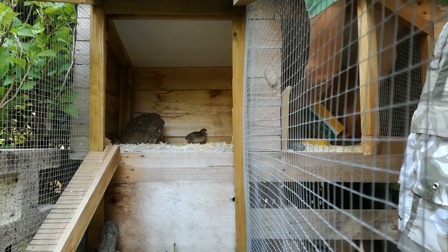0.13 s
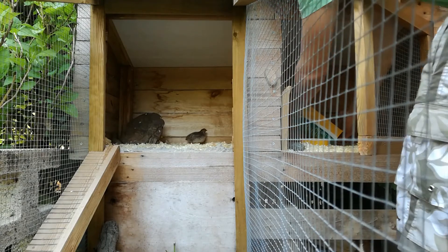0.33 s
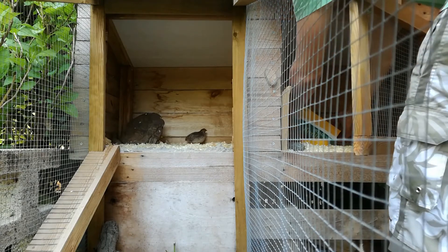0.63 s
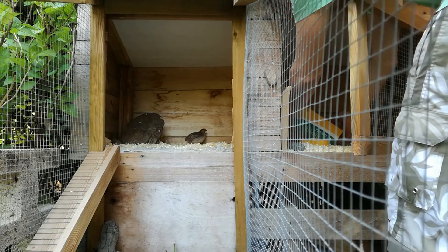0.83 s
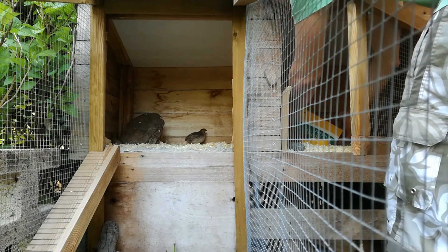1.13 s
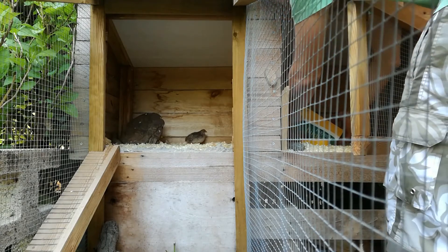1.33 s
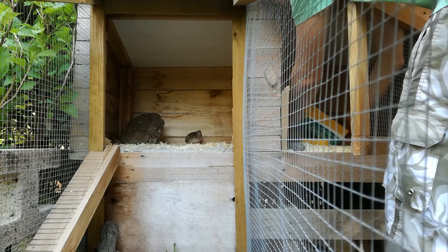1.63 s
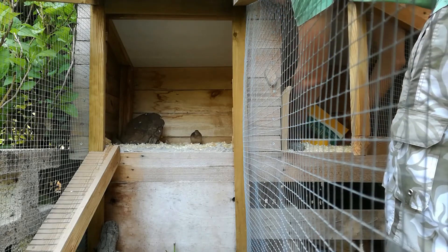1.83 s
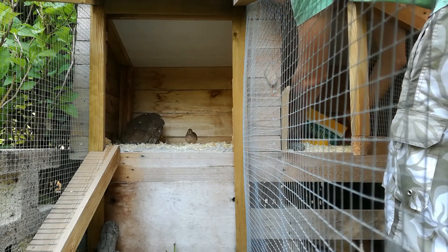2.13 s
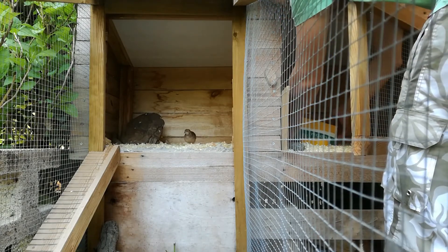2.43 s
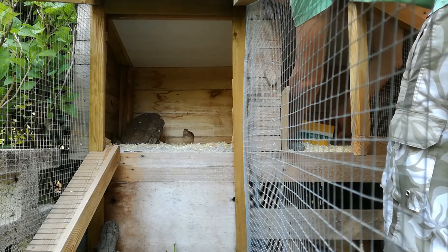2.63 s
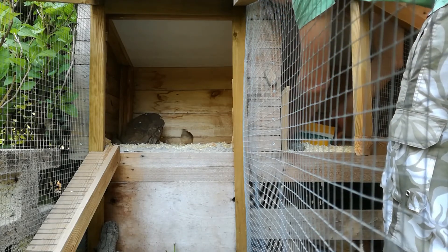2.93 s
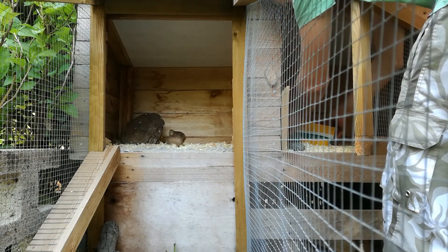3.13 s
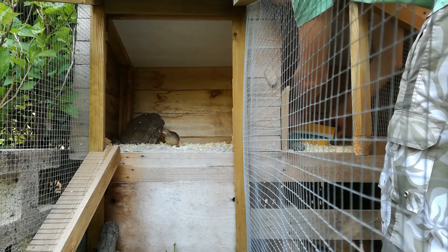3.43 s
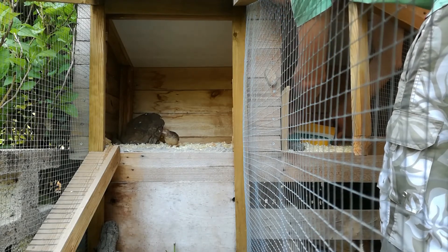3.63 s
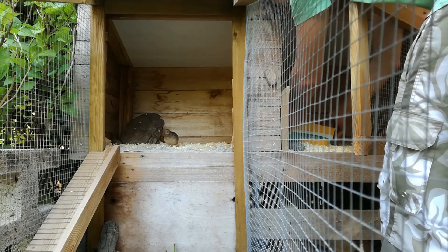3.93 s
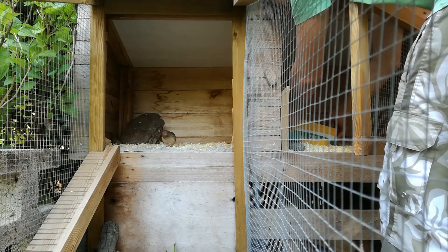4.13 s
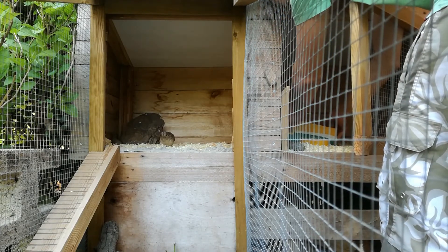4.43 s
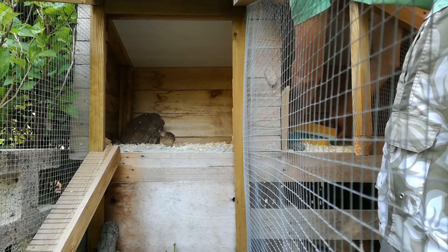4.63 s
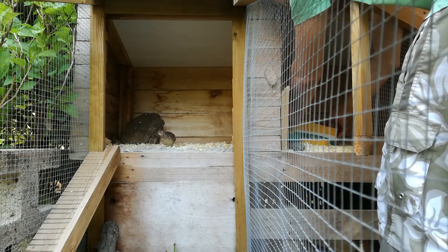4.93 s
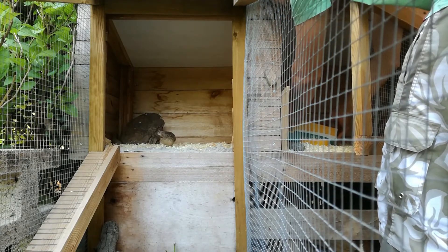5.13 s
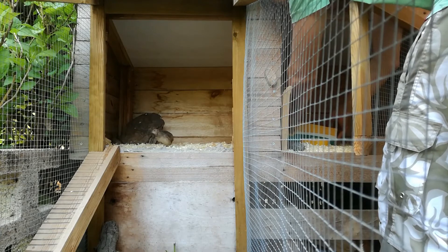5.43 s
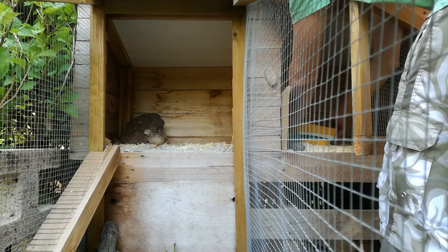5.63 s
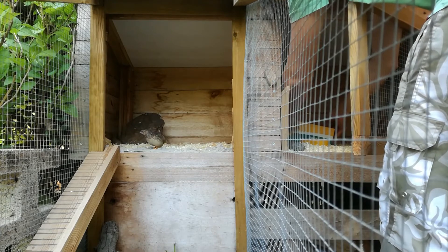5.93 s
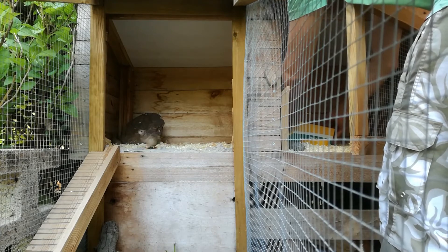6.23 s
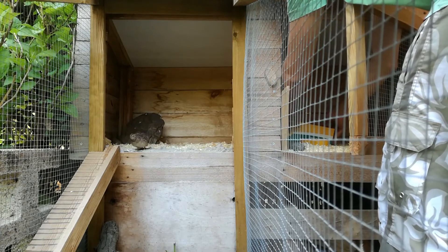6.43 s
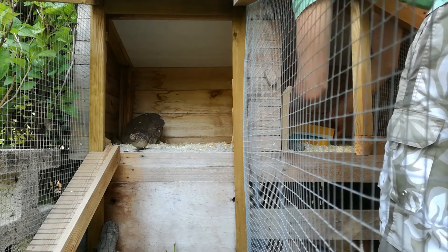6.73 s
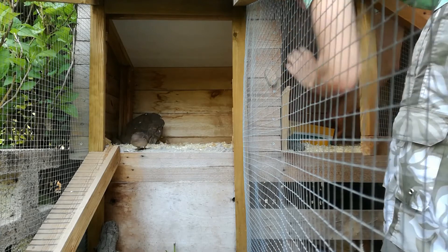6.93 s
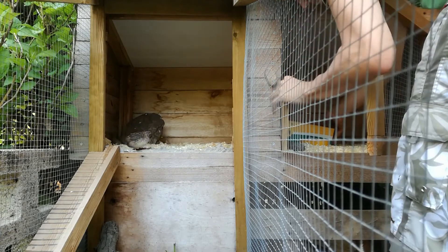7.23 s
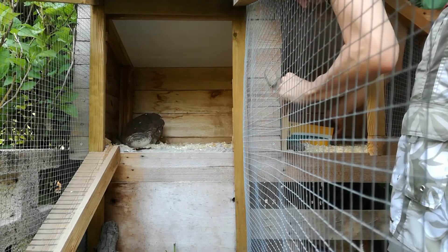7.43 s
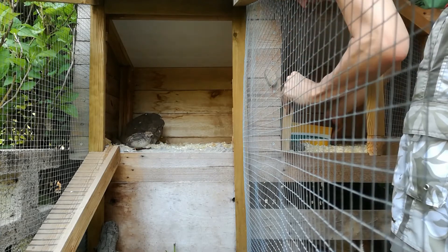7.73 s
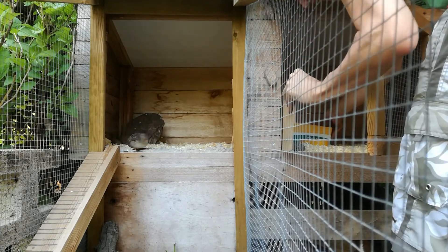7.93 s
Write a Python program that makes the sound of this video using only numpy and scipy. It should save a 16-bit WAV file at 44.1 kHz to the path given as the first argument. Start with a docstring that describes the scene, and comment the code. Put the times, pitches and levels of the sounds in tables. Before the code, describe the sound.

Outdoors, close to a small wooden hutch, quail give a brief crisp scratch in dry shavings, then fall nearly silent. A rapid flurry of sharp strokes and small woody knocks follows, then sparse soft shuffles. A second, softer spell of scraping comes later and dies into light rustles. Boxy short echoes, quiet garden hiss, wide stereo bass.

```python
"""On the floor of a small wooden hutch, outdoors, quail scratch and shuffle in wood shavings.
Strokes and shuffles are swelling swarms of random snaps in octave bands; soft rustles fill in between.
Knocks are short noise bursts coloured as boards; the frame rumbles and faint thin tones come and go.
Dense echoes and box resonances colour the moves and knocks, over a quiet garden hiss in shaped noise.
The microphone pair widens the bass."""
import sys
import numpy as np
from scipy import signal
from scipy.fft import rfft, irfft
from scipy.io import wavfile

SR = 44100
rng = np.random.default_rng(int(sys.argv[2]) if len(sys.argv) > 2 else 0)


def digitize_waveform(pressure):
    """Quantize a signal to 16-bit integers and store it at the path in sys.argv[1].

    Rows of a 2-D input are taken as channels; values are limited to [-1, 1].
    """
    field = np.atleast_2d(pressure).T
    bounded = np.clip(field, -1, 1)
    quanta = np.round(bounded * 32767).astype(np.int16)
    wavfile.write(sys.argv[1], SR, quanta)


N = 356151
FREQ = np.fft.rfftfreq(N, 1 / SR)
BIRDS_PAN_DB = -1.5  # left minus right

# relative spectrum of snapping flakes: frequency_hz, density_db
FLAKE_SPECTRUM = [(100, -35), (300, -24), (600, -23), (1000, -10.5), (2400, -9), (3400, -6), (4600, -1.5),
                  (5600, -3), (7000, -12.5), (9500, -19), (14500, -25)]


def undb(db):
    """Logarithmic level: decibels become an amplitude ratio."""
    return 10 ** (np.asarray(db) / 20)


def centred_time(size):
    """Time axis in seconds with its zero in the middle of the block."""
    return (np.arange(size) - size / 2) / SR


def spectrum(points, hz):
    """Spectral envelope: dB points joined by straight lines on a log-frequency axis."""
    at_hz, db = np.transpose(points)
    return undb(np.interp(np.log(hz + 1), np.log(at_hz), db))


def colour(x, points, low_db=0, high_db=0, low_hz=2000, high_hz=7500):
    """Linear filtering: white sound takes a spectrum at equal power, then low and high shelves."""
    hz = np.fft.rfftfreq(x.shape[-1], 1 / SR)
    gain = spectrum(points, hz)
    gain = gain / np.sqrt(np.mean(gain ** 2))
    low_shelf = low_db / (1 + (hz / low_hz) ** 4)
    high_shelf = high_db * (1 - 1 / (1 + (hz / high_hz) ** 4))
    return irfft(rfft(x) * gain * undb(low_shelf + high_shelf), x.shape[-1])


def swell(t, rise, fall, rise_shape=1.95, fall_shape=1.2):
    """Amplitude envelope: stretched exponentials rise to a peak at t = 0 and fall from it."""
    before = np.abs(t / rise) ** rise_shape
    after = np.abs(t / fall) ** fall_shape
    return np.exp(-np.where(t < 0, before, after))


def crackle(size, rate, spread_db):
    """Shot noise: random snaps, rate per second, of randomly spread sizes and unit total power."""
    snaps = rng.standard_normal(size) * (rng.random(size) < rate / SR)
    boost = np.minimum(rng.exponential(size=size), np.pi)
    snaps = snaps * undb(spread_db * boost)
    return snaps / np.sqrt(np.mean(snaps ** 2) + 1e-18)


def add(out, x, start, pan_db):
    """Superposition: a stereo sound joins the mix at its start, panned by level difference."""
    i = int(round(start * SR))
    a, b = max(i, 0), min(i + x.shape[1], N)
    out[:, a:b] += undb([[pan_db / 2], [-pan_db / 2]]) * x[:, a - i:b - i]


def convolve(x, response):
    """Convolution with an impulse response, kept at the sound's own length."""
    return signal.fftconvolve(np.atleast_2d(x), response, axes=1)[:, :x.shape[-1]]


def reflect(x, t60=0.062, direct_db=1.5, late_db=-22, late_t60=0.35, lag_s=.00045, size=6000):
    """Reverberation of close walls: direct sound and a fresh pattern of dense echoes at each port."""
    t = np.arange(size) / SR
    decay = undb(-60 * t / t60) + undb(late_db - 60 * t / late_t60)
    response = rng.standard_normal((2, size)) * decay
    response /= np.sqrt(np.sum(response ** 2, axis=1, keepdims=True))
    # the direct sound reaches the left port later, by 0.5 to 1.5 times lag_s
    left_lag = int(lag_s * SR * (.5 + rng.random()))
    response[0, left_lag] += undb(direct_db)
    response[1, 0] += undb(direct_db)
    return convolve(x, response / np.sqrt(1 + undb(direct_db) ** 2))


def garden(level_db=-61.5, pan_db=-1.0):
    """Broadband noise: a smooth distant outdoor hiss with a little low rumble."""
    # relative spectrum: frequency_hz, density_db
    hiss_spectrum = [(20, -25), (50, 3.5), (90, 4.5), (160, -3.5), (400, -13), (1000, -12), (2200, -12),
                     (4800, -9), (7500, -14.5), (11000, -26), (15000, -25)]
    levels_db = level_db + np.array([[pan_db], [-pan_db]]) / 2
    return undb(levels_db) * colour(rng.standard_normal((2, N)), hiss_spectrum)


def tones(size=32768):
    """Narrowband noise: random phases close to a gliding pitch make faint tones that swell and fade."""
    # faint thin tones and distant twitter: peak_s, pitch_hz, level_db, half_length_s, width_hz, glide_hz_per_s
    tone_events = [(.575, 1324, -66.5, 0.072, 20, 0), (.584, 5500, -67, 0.084, 50, 0),
                   (4.329, 3220, -60.5, 0.16, 180, 392), (4.33, 4160, -60, 0.14, 190, 1494),
                   (5.795, 4230, -60, .02, 70, -5000), (6.373, 1287, -65, .04, 20, 5),
                   (6.577, 1280, -63.5, 0.049, 29, 0), (6.824, 1220, -66, 0.082, 27, 0),
                   (7.1, 1240, -69.5, .05, 29, 0), (7.253, 4700, -63.5, 0.75, 680, 7)]
    out, t = np.zeros((2, N)), centred_time(size)
    for s, hz, db, half, width, glide in tone_events:
        spread = np.exp(-(np.fft.fftfreq(size, 1 / SR) / width) ** 2 / 2)
        flutter = np.fft.ifft(spread * np.exp(2j * np.pi * rng.random((2, size))))
        carrier = np.exp(2j * np.pi * (hz + glide * t / 2) * t)
        tone = np.real(flutter * carrier)
        add(out, undb(db) * swell(t, half, half) * tone / tone.std(), s + t[0], pan_db=-1.0)
    return out


def shuddering():
    """Structure-borne sound: the timber frame rumbles softly when weight shifts on it."""
    # shudders of the frame: peak_s, level_db, swell_s, fade_s
    shudders = [(1.57, -59, .041, .049), (1.72, -62, 0.11, 0.29), (2.61, -60, 0.08, 0.15),
                (5.57, -54, 0.12, 0.088), (6.055, -49.5, 0.012, 0.037), (6.16, -55, 0.15, 0.19)]
    # relative spectrum: frequency_hz, density_db
    frame_spectrum = [(25, -17), (55, 1.5), (90, -2.5), (170, 1.5), (280, -12), (400, -11), (480, -6),
                      (600, -21), (1500, -25), (4000, -70)]
    t = np.arange(N) / SR
    level = sum(undb(db) * swell(t - s, rise, fall) for s, db, rise, fall in shudders)
    return level * colour(rng.standard_normal((2, N)), frame_spectrum)


def knocking(size=16384, contact_s=0.0037, bite_s=0.00052, pan_db=-0.5):
    """Impact excitation: brief rough contact; a small board rings higher, thick bedding dulls the blow."""
    # knocks on the boards: start_s, level_db, low_cut_hz, high_cut_hz
    knocks = [(.1, -53, 380, 1400), (1.609, -49, 402, 1280), (1.991, -38.5, 840, 3000),
              (2.038, -38.5, 1220, 4040), (2.358, -30.5, 856, 3100), (2.378, -39, 400, 3260),
              (2.515, -40.5, 800, 5000), (2.528, -46, 600, 2800), (2.845, -68, 300, 503),
              (3.025, -52, 710, 2000), (3.164, -51.5, 600, 2000), (4.634, -55.5, 740, 3980),
              (5.273, -47, 840, 3180), (5.5, -35.5, 476, 1880), (6.037, -47.5, 490, 1310),
              (6.065, -49, 383, 850), (6.468, -42, 376, 3600), (6.945, -40, 1160, 1530),
              (7.256, -65.5, 300, 705)]
    # relative spectrum of a blow: frequency_hz, density_db
    board_spectrum = [(100, 0), (400, 5), (520, 1.5), (780, -2), (1250, 6), (1900, 3), (2800, -2.5),
                      (5500, 2.5), (8000, -9.5), (15000, -21)]
    out, t = np.zeros((2, N)), centred_time(size)
    age = np.maximum(t, 0)
    contact = (1 - np.exp(-age / bite_s)) * np.exp(-age / contact_s / 2)
    for s, db, low_hz, dull_hz in knocks:
        knock = colour(rng.standard_normal(size) * contact, board_spectrum)
        knock = signal.sosfilt(signal.butter(4, low_hz, "high", fs=SR, output="sos"), knock)
        knock = signal.sosfilt(signal.butter(2, dull_hz, fs=SR, output="sos"), knock)
        knock = reflect(knock)
        # unit power over twice the contact time
        knock /= np.sqrt(np.sum(knock ** 2) / 2 / (2 * contact_s * SR))
        add(out, undb(db) * knock, s + t[0], pan_db)
    return out


def stirring(count=80, size=12288, trim_db=-2.5):
    """Overlapping grains: soft rustles as the birds shift their weight, each from another spot."""
    # level curve of the light stirring, before the trim: time_s, level_db
    stir_curve = [(0, -61), (.3, -57), (.8, -71.5), (1.4, -75), (1.56, -56), (1.83, -57.5), (2.35, -55.5),
                  (2.75, -56), (3.1, -58), (3.4, -69), (4.35, -61), (4.66, -66), (5.5, -55.5),
                  (5.75, -63.5), (5.88, -61), (6.6, -59), (7.2, -69.5), (8.08, -59)]
    step = N / SR / count
    out, t = np.zeros((2, N)), centred_time(size)
    window = np.cos(np.pi / 2 * np.clip(t / step, -1, 1))
    for s in step * np.arange(count + 1):
        level_db = trim_db + np.interp(s + t, *np.transpose(stir_curve))
        snaps = crackle(size, rate=6000, spread_db=1.8) * window * undb(level_db)
        rustle = colour(snaps, FLAKE_SPECTRUM, low_db=8.5, high_db=4.5)
        add(out, reflect(rustle), s + t[0], BIRDS_PAN_DB)
    return out


def footwork(t, rise, fall, settle_db=-28, settle_s=0.027):
    """Force envelope: a push swells and fades; thrown flakes patter back on a faint exponential tail."""
    push = swell(t, rise, fall)
    settling = undb(settle_db) * swell(t, rise, settle_s, fall_shape=1)
    return np.hypot(push, settling)


def swarm(t, rise, fall, dig=0.083, rate=3500, spread_db=0.5, shared=0.61, count=6):
    """Shot noise in octave bands: the claw skims fine flakes first and reaches coarse ones later."""
    octave = np.log2((np.fft.rfftfreq(len(t), 1 / SR) + 1) / 4500)
    centres = np.arange(count) - count + 2  # octaves from 4500 Hz
    together, out = crackle(len(t), rate, spread_db), 0
    for centre, member in zip(centres, np.eye(count)):
        own = crackle(len(t), rate / 2, spread_db)
        snaps = np.sqrt(shared) * together + np.sqrt(1 - shared) * own
        lead = dig * min(rise, fall) * max(centre, -2)
        band = np.interp(octave, centres, member)
        # the exponent keeps power about constant where partly shared bands overlap
        out = out + rfft(snaps * footwork(t + lead, rise, fall)) * band ** ((1 + shared) / 2)
    return irfft(out, len(t))


def flakes(t, rise, fall, weight_db, crisp_db):
    """Source and room: one foot's swarm of snapping flakes, filtered and heard in the box."""
    snaps = swarm(t, rise, fall)
    return reflect(colour(snaps, FLAKE_SPECTRUM, weight_db, crisp_db, low_hz=2170, high_hz=7600))


def shuffling(size=16384, swell_s=.03, fade_s=0.041, weight_db=3.5):
    """Slow friction: pushes through the shavings, all of one shape and fullness."""
    # slow shuffles through the bedding: peak_s, level_db, crispness_db
    shuffles = [(0.224, -58, 17), (.346, -57, 12), (.567, -58.5, 0), (2.41, -57, 10), (3.13, -59, 4),
                (3.652, -55, 0), (3.755, -57, 1), (3.959, -52, -2.5), (4.041, -56.5, 6), (4.268, -49.5, -7),
                (4.345, -54.5, -11), (4.492, -52.5, 4), (4.875, -55, 11.5), (4.988, -51, -2),
                (5.125, -46, 2), (5.364, -35, 2.5), (5.556, -51.5, 15), (5.654, -50.5, 2), (6.4, -51.5, 7),
                (6.675, -53, 11), (7.67, -58.5, 9), (7.769, -60.5, 17), (7.98, -52, 5)]
    out, t = np.zeros((2, N)), centred_time(size)
    for s, db, crisp_db in shuffles:
        shuffle = flakes(t, swell_s, fade_s, weight_db, crisp_db)
        add(out, undb(db) * shuffle, s + t[0], BIRDS_PAN_DB)
    return out


def scratching(size=16384, swell_share=0.48):
    """Force-dependent spectrum: harder claw strokes flick the flakes and sound thinner."""
    # quick foot strokes: peak_s, level_db, length_s, crispness_db
    strokes = [(.003, -36.5, 0.014, 5), (0.033, -37.5, 0.026, 7.5), (0.07, -47.5, 0.071, 16),
               (0.131, -40.5, 0.0092, 10), (0.161, -49.5, 0.044, 13.5), (1.398, -43, 0.014, 7),
               (1.454, -35.5, 0.037, 0), (1.48, -38, 0.038, 0.5), (1.516, -51.5, 0.024, 15),
               (1.582, -52, .018, 8), (1.613, -47.5, 0.032, -3), (1.66, -42.5, 0.02, 8.5),
               (1.676, -26, 0.014, -6), (1.706, -44, 0.018, 4), (1.735, -39.5, 0.028, 5),
               (1.783, -48.5, 0.041, 8.5), (1.869, -44, 0.031, 10), (1.916, -53, 0.011, 12),
               (1.951, -33, 0.02, -1), (1.98, -37.5, 0.036, -9), (1.993, -37.5, 0.032, -5.5),
               (2.04, -20, 0.0083, -9), (2.102, -45.5, 0.018, 7), (2.139, -34, 0.022, 5.5),
               (2.181, -47.5, 0.034, 14), (2.209, -39, 0.027, 14), (2.225, -23.5, 0.013, -5),
               (2.275, -39.5, 0.016, 1), (2.296, -49.5, 0.03, 10), (2.604, -46.5, 0.021, -12),
               (2.651, -52, 0.021, 3), (2.953, -55, 0.02, -6), (2.991, -51.5, .013, -13),
               (3.097, -54.5, 0.015, 1), (4.717, -51.5, .011, 3), (4.76, -40.5, 0.058, 0.5),
               (4.782, -42, 0.034, 3.5), (5.242, -59, 0.018, 0), (5.285, -44.5, 0.0092, -8),
               (5.392, -34.5, 0.041, -3.5), (5.47, -32, 0.034, -3), (5.493, -38, 0.031, -1),
               (5.6, -43, 0.014, 1.5), (6.447, -57, 0.012, 10), (6.472, -53.5, .014, 17),
               (6.639, -46, 0.029, -2.5), (6.807, -47, 0.018, 8.5), (6.827, -47, 0.013, 10.5)]
    medium_db, medium_weight_db, thinning_db_per_db = -40.5, -1, 0.64
    out, t = np.zeros((2, N)), centred_time(size)
    for s, db, length, crisp_db in strokes:
        weight_db = medium_weight_db - thinning_db_per_db * (db - medium_db)
        rise, fall = swell_share * length, (1 - swell_share) * length
        stroke = flakes(t, rise, fall, weight_db, crisp_db)
        add(out, undb(db) * stroke, s + t[0], BIRDS_PAN_DB)
    return out


def hutch(x):
    """Modal resonance: the wooden box lifts or weakens narrow bands of the moves and knocks inside."""
    # resonances of the box: frequency_hz, width_hz, lift_db
    modes = [(512.5, 57, 7), (731, 39, 7), (957, 30, 4.5), (1210, 31, 1), (1440, 15, -16.5), (1830, 51, 1),
             (2853, 54, 5), (3716, 90, 2.5), (4210, 160, 1.5), (5150, 130, -1.5), (5126, 170, 4),
             (5620, 48, 0)]
    body = 1 + sum((undb(db) - 1) / (1 + 2j * (FREQ - hz) / width) for hz, width, db in modes)
    return irfft(rfft(x) * body, N)


def scene():
    """Superposition of everything in the hutch, over the garden."""
    background = garden() + tones() + shuddering()
    inside = knocking() + stirring() + shuffling() + scratching()
    return background + hutch(inside)


def record(dry, top_hz=15700):
    """Mid-side stereo: the microphone pair stresses port differences in the bass; the top is cut."""
    # width of the pair: frequency_hz, side_minus_mid_db
    width_curve = [(60, 13.5), (180, 10.5), (380, 5), (800, 2), (1400, -1.5), (2400, -2.5), (4400, 0),
                   (8000, 0)]
    ratio = spectrum(width_curve, FREQ)
    norm = np.sqrt(2 / (1 + ratio ** 2))
    mid = irfft(rfft(dry[0] + dry[1]) / 2 * norm, N)
    side = irfft(rfft(dry[0] - dry[1]) / 2 * norm * ratio, N)
    low_pass = signal.ellip(10, .2, 70, top_hz, fs=SR, output="sos")
    return signal.sosfilt(low_pass, np.array([mid + side, mid - side]))


dry = scene()
out = record(dry)
digitize_waveform(out)
```